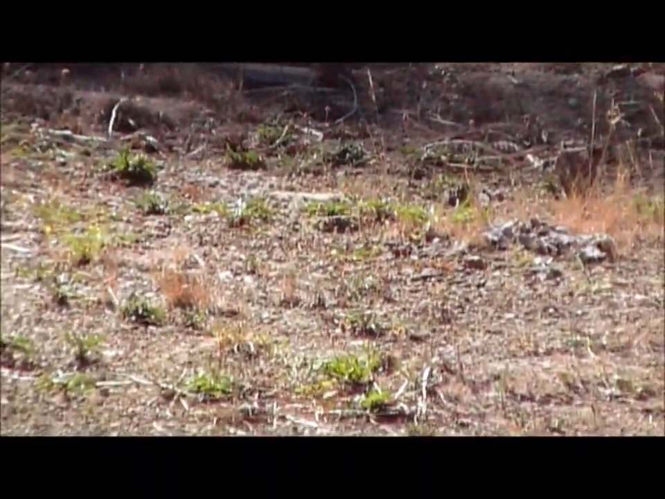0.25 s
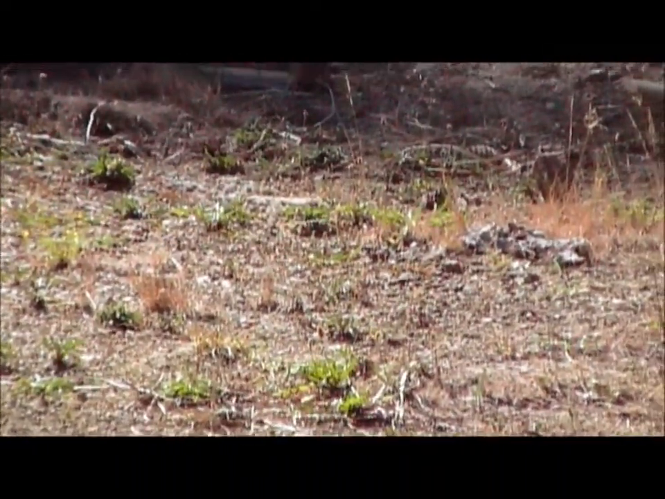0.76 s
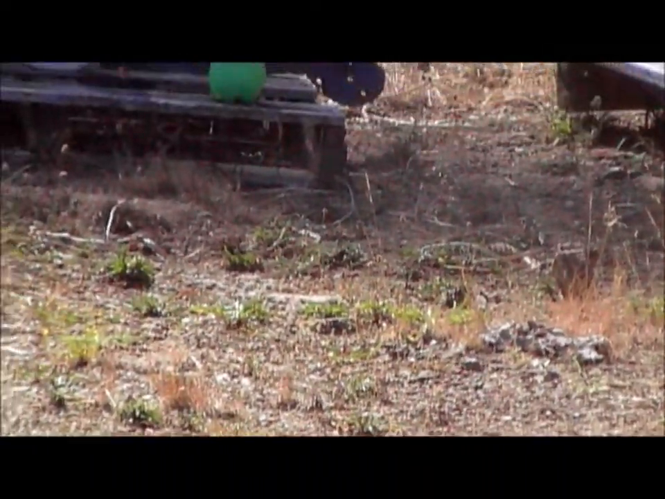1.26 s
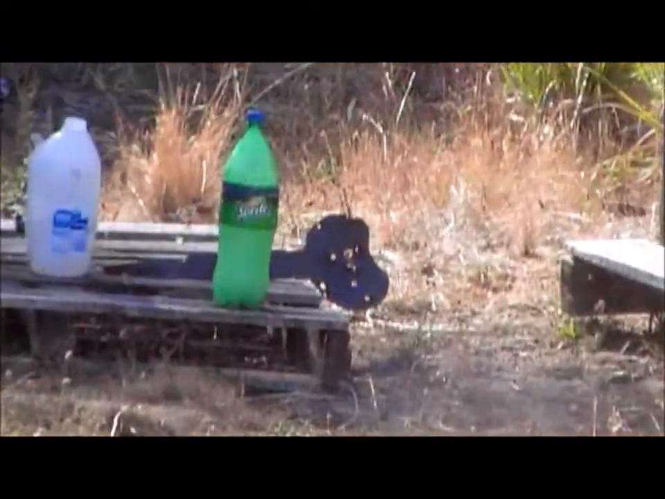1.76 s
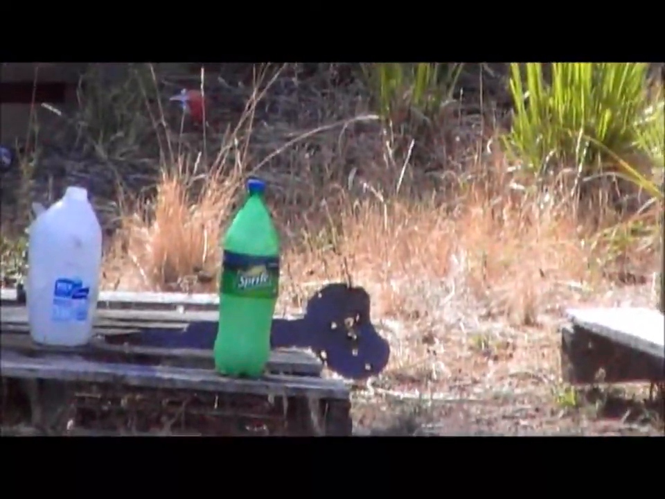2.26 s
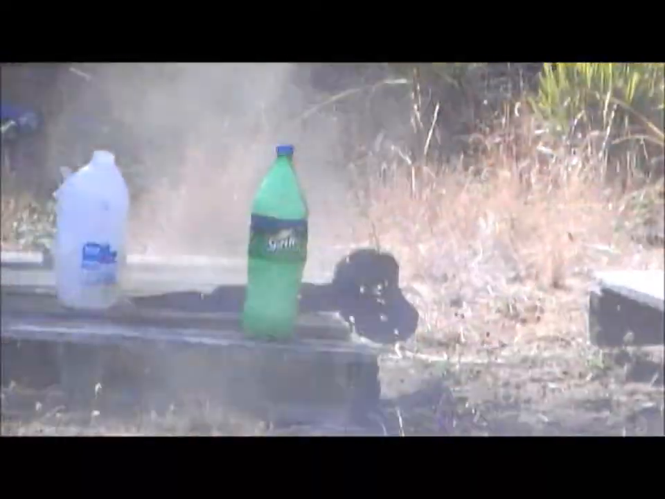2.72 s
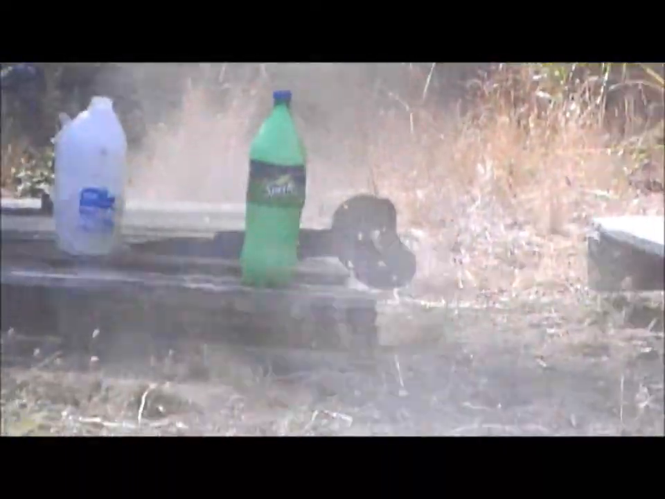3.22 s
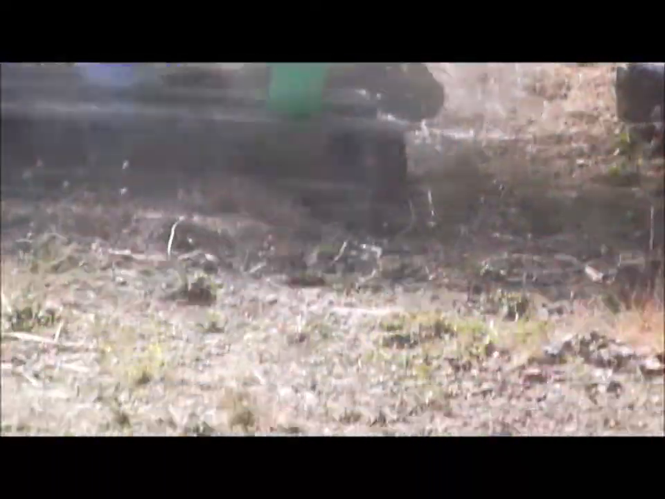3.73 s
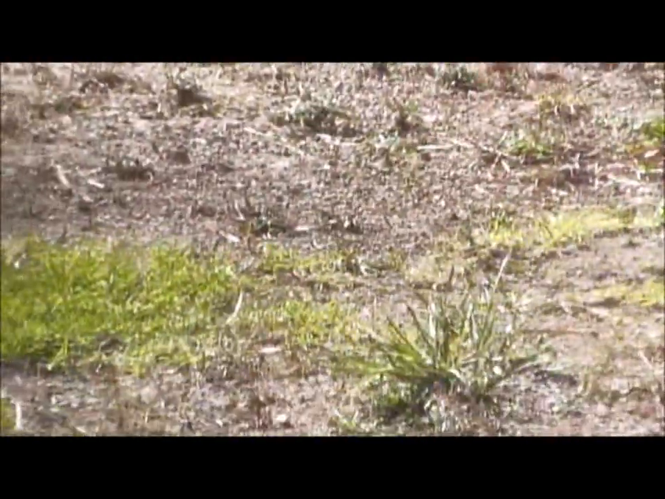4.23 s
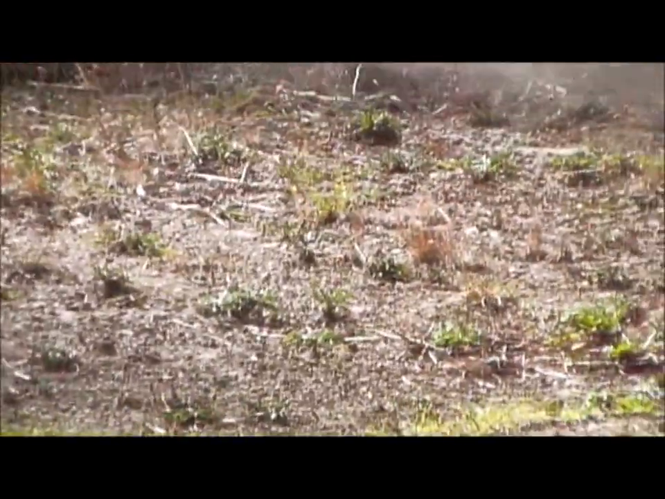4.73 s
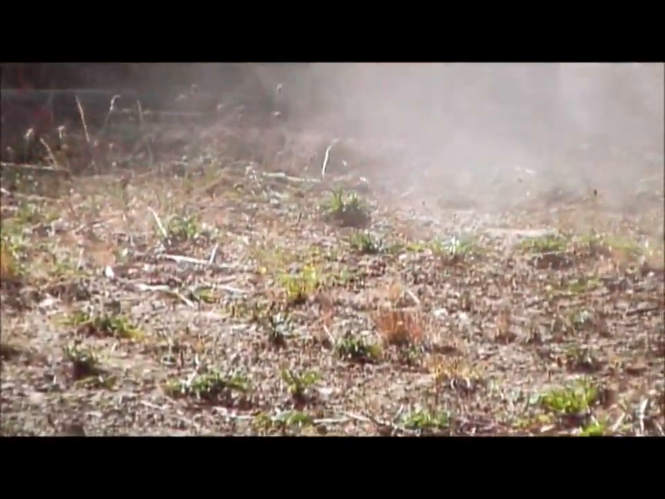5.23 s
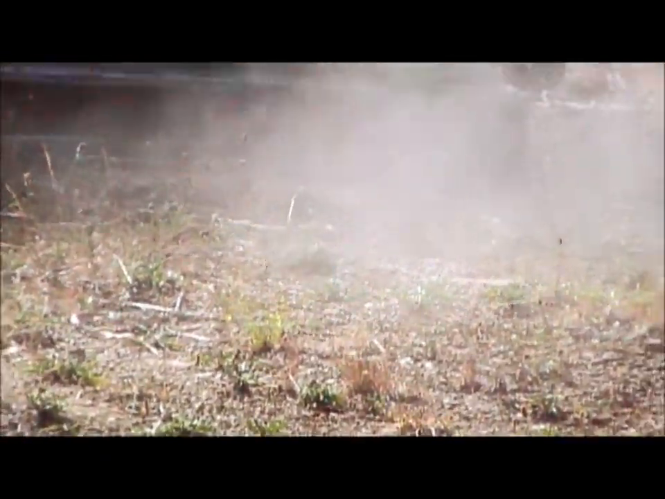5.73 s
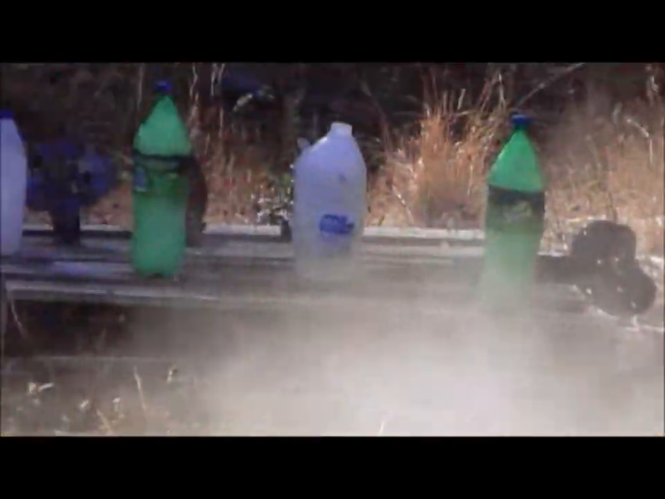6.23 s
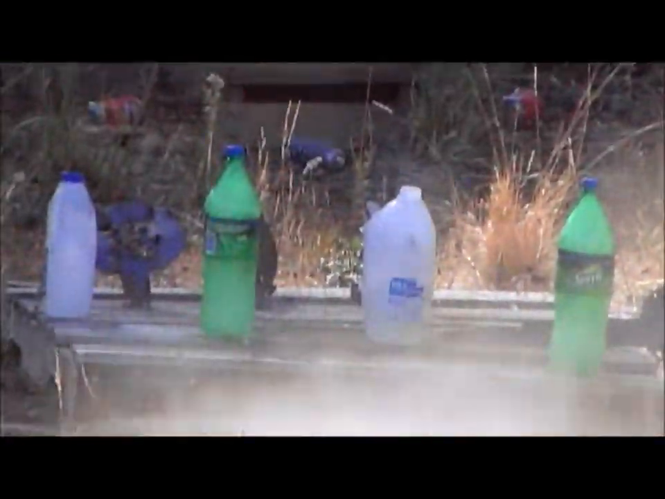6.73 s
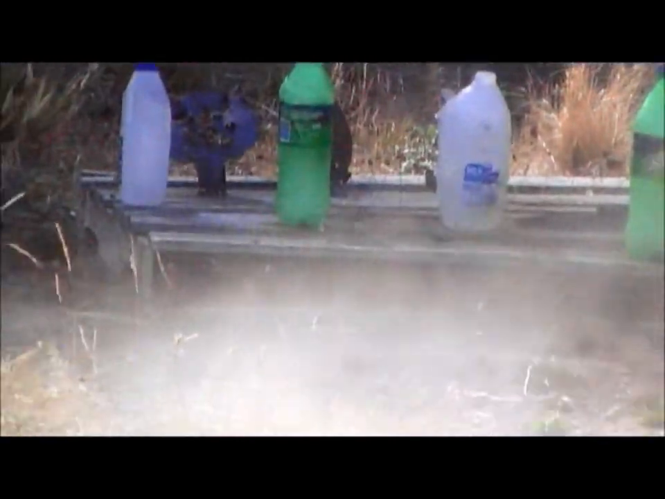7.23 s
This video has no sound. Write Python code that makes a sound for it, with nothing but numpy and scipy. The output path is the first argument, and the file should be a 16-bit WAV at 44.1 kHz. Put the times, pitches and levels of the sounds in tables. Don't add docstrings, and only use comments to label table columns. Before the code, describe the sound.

From 0 to 2.5 seconds, a quiet outdoor bed: far low rumble, airy cicada hiss, short dry cricket rasps and rapid, very high katydid ticks, with a couple of tiny clicks. At 2.53 a single rifle shot bursts out, extremely loud, clipped and crunchy on a small stereo microphone, with a short low thump. Hard bright slaps follow within a tenth of a second, then dense hillside returns surge around 2.75 and 3.0, becoming duller and rolling away; a weak far return lingers around 3.7 to 3.9. From about 4.0 to 4.3 small gritty clicks patter nearby as the tail disappears. The insect bed resumes, slightly rumblier, with faint pure bird peeps from 5.5 onward. A light metal tick at 7.02 precedes a sharper, bright double clack of gun parts around 7.15, then the quiet insects continue to the end at about 7.5.

```python
import sys
import numpy as np
from scipy import signal
from scipy.fft import rfft, irfft, next_fast_len
from scipy.io import wavfile

SR = 44100
rng = np.random.default_rng(int(sys.argv[2]) if len(sys.argv) > 2 else 0)


def generate_wav(signal):
    frames = np.transpose(np.atleast_2d(signal))
    scaled = np.clip(frames, -1, 1) * 32767
    pcm = np.round(scaled).astype(np.int16)
    wavfile.write(sys.argv[1], SR, pcm)


def volts_from_decibels(level):
    exponent = np.asarray(level, float) / 20
    return 10 ** exponent


N = 329427

# (time [s], level [dB], hold [ms], low edge [Hz], high edge [Hz])
SLAPS = [(2.5319, 5, 7, 2400, 9000), (2.5325, 5, 5, 800, 3600), (2.5705, -12, 1.2, 3000, 8000),
         (2.6012, -8, 5.5, 1500, 9000), (2.6290, -15, 3.5, 800, 7000), (2.6331, -8, .2, 1000, 9000),
         (2.6344, -9, 1.5, 2050, 2650), (2.6348, -11, 3, 4500, 7500), (2.6452, -4, .5, 1500, 10000),
         (2.7530, -18, 4, 1200, 8000), (2.8070, -17, 42, 1100, 2100), (2.7900, -12, .4, 800, 6000),
         (2.8715, -12, .4, 500, 4000), (3.0070, -13, .4, 500, 2800), (3.1905, -28, .4, 6000, 11000)]
SLAP_T60_MS, SLAP_T60_PER_HOLD = 6, 0.66
THUMP_DB, THUMP_HZ, THUMP_T60_S = -5, 70.5, .018

# (arrival [s], level [dB], rise [s], fall [dB/s], tilt [dB/octave])
RETURNS = [
    (2.533, -1.5, 0.0026, 150, -3.5),
    (2.535, 2, 0.013, 158, 2.5),
    (2.60, -13, .018, 15, 4.5),
    (2.645, -1.5, 0.04, 377, 2.5),
    (2.753, 2.5, 0.059, 84.5, 2),
    (2.81, -1.5, 0.064, 94, 0),
    (2.9, -1, 0.123, 22.5, 1),
    (3.005, 3.1, 0.042, 132, -0.05),
    (3.05, -6.5, 0.094, 27.5, 1.5),
    (3.7, -22.5, 0.22, 11, 4),
]
SHOT_S, SILENT_S = 2.533, 5.0
FRONT_DB, BASS_LAG = 9, .18
PATH_DB_PER_S, PATH_SLOPE = 21, 1.33
AIR_DB_PER_S = 14.5
HORIZON_S, HORIZON_DB, HORIZON_FADE_S = 3.897, 7.1, 0.084
# (frequency [Hz], level [dB per Hz])
REPORT_COLOUR = [(60, -70), (130, -40), (190, -19.5), (256, -10), (398, -10), (500, 0.5), (650, 0),
                 (1220, -5.5), (1950, -5.5), (3200, -9.5), (6600, -5), (8800, -19), (12500, -30.5),
                 (16000, -48.5)]
# (frequency [Hz], side over mid [dB])
REPORT_SIDE = [(60, -5.5), (110, -14.5), (200, -17.5), (380, -24), (700, -26.5), (1290, -18.5),
               (2380, -20.5), (4400, -22), (8120, -8), (15000, 0)]
REPORT_DB = -13.5

# (time [s], level [dB], brightness [dB/octave])
TOUCHES = [(7.0200, -30, 10), (7.0212, -44, 13), (7.0243, -28, -1), (7.1433, -27, -3), (7.1462, -33, -2.5),
           (7.1495, -37, .4), (7.1567, -24, 6), (7.1580, -11.5, 4.5), (7.1586, -14, 5), (7.1612, -16.5, 0),
           (7.1655, -30, 2.5), (7.1720, -36, 4), (7.1790, -37, 3)]
# (frequency [Hz], level [dB], t60 [s])
METAL_MODES = [(1780, -22, .020), (2600, -9, .030), (3600, -8, .030), (4500, -15, .016), (5700, -9, .024),
               (5950, -9, .024), (6400, -7, .026), (7400, -1, .010), (7700, -2, .014), (8050, -1, .010),
               (8900, 1, .007), (10650, -2, .012)]
# (time [s], level [dB], t60 [ms], low edge [Hz], high edge [Hz])
CLICKS = [(.7701, -45.5, 24, 3800, 5400), (.8270, -39, 20, 1000, 6800), (1.2895, -47, 15, 3500, 5500),
          (3.9740, -43.5, 50, 3770, 10980), (3.9890, -33, 15, 1500, 7020), (3.9943, -33, 73, 1200, 7460),
          (4.0190, -39, 60, 2500, 8000), (4.0458, -41, 10, 7440, 12000), (4.243, -45, 49, 1000, 4500),
          (4.2378, -36, 40, 3000, 7000), (4.2935, -32, 12, 3500, 14000), (5.8301, -43, 22, 2000, 5500),
          (5.9693, -40.5, 25, 2200, 5500), (5.5625, -47, 35, 1300, 2800), (7.0200, -35.5, 43, 3520, 12100),
          (7.1442, -32, 36, 2010, 11900), (7.1567, -30.5, 25, 2200, 12100),
          (7.1602, -34.5, 102, 4500, 9240)]
CLICK_HOLD_SHARE = 0.016

# (last tooth [s], level [dB], even teeth [count], slow lead teeth [count])
STROKES = [(.0511, -49, 4, 0), (.2350, -49, 4, 0), (.4086, -48, 4, 0), (.577, -57, 1, 0),
           (1.0146, -47, 15, 10), (1.7178, -47.5, 15, 5), (1.8895, -50, 3, 0), (2.0492, -53, 4, 0),
           (2.2067, -51, 5, 0), (2.3647, -49, 5, 0), (2.508, -45, 5, 0), (3.4643, -44, 13, 7),
           (4.988, -56, 4, 0), (5.1227, -47.5, 4, 0), (5.2682, -45.5, 4, 0), (5.4272, -44, 4, 0),
           (5.5874, -47.5, 4, 0), (5.7613, -47, 4, 0), (5.9459, -47.5, 3, 0), (6.5139, -47, 13, 7),
           (7.4550, -51, 4, 0)]
# (frequency [Hz], level [dB], t60 [s])
WING_MODES = [(10000, -9, .003), (11700, 1, .005), (12700, -1, .003), (14300, -3, .002)]
SHORT_GAP_S, LONG_GAP_S, SLOWING_S = .0074, .00785, .0011

# (time [s], length [s], level [dB])
CHIRPS = [(0.049, 0, -40.5), (.1266, 0.031, -39.5), (0.248, .027, -40), (.407, 0.12, -40),
          (0.767, .057, -39), (1.288, 0.07, -37), (1.634, 0, -34), (1.7614, .039, -37), (1.9684, 0, -36),
          (2.1256, 0, -42), (2.2134, 0.0038, -44), (4.3483, 0.069, -41.5), (4.5773, 0.053, -40),
          (4.714, 0, -43), (4.7908, 0.068, -43), (5.0537, .044, -39), (5.2962, 0.0035, -41.5),
          (5.375, 0.0079, -40.5), (5.8305, 0, -43), (5.969, 0.013, -45), (6.073, 0.0023, -44),
          (6.1592, 0.0085, -42), (6.472, 0.0039, -47.5)]
RASP_GAP_S, FIRST_RASP_DB = .04, -4

# (time [s], length [s], frequency [Hz], level [dB])
PEEPS = [(5.54, .13, 3420, -65), (5.73, .09, 3460, -66), (5.85, .12, 3460, -64), (6.24, .14, 3470, -67),
         (7.33, .12, 3700, -67), (6.29, .07, 2290, -64), (6.43, .07, 2310, -65), (6.55, .07, 2310, -65),
         (6.83, .07, 2320, -65), (7.36, .07, 2310, -63)]
WHINE_HZ, WHINE_DB = 10100, -78.5

# (time [s], level [dB])
CHORUS = [
    [(0.0, -57), (0.75, -56), (1.17, -56), (2.02, -54.5), (2.23, -57.5), (2.45, -55)],
    [(3.9, -56.5), (4.12, -53.5), (4.34, -58), (4.68, -56.5), (5.49, -58.5), (6.23, -55.5), (6.36, -57.5),
     (6.75, -57.5), (7.47, -56.5)],
]
CHORUS_DB = -56
RUMBLE_HZ, CHORUS_HZ, CHORUS_TOP_HZ = 800, 6000, 11000
STIRRED_DB, STIRRED_S = 1.66, 4.0
# (frequency [Hz], level [dB per Hz])
FIELD_COLOUR = [(24, -45), (60, -28.5), (140, -14), (330, -4.5), (700, 3.5), (1150, -1), (1600, -7.5),
                (4000, -7.5), (5200, -3.5), (6500, 1), (7800, -8), (9100, -19), (12500, -25.5),
                (15650, -24.5), (15900, -45)]
# (frequency [Hz], side over mid [dB])
FIELD_SIDE = [(60, 0.5), (99, -6), (160, -7), (270, -7.5), (450, -12), (740, -15), (1220, -12),
              (2010, -10.5), (3330, -9.5), (5500, -22), (9080, 6), (15000, 4)]
FIELD_DB = -51.5

# (time [s], length [s], level [dB], top frequency [Hz])
PUFFS = [(.05, .4, -83, 90), (.5, .8, -86, 100), (1.35, .25, -88, 80), (2.0, 0.39, -87, 90),
         (2.66, .05, -54, 250), (2.74, .07, -48, 240), (3.2, .3, -79, 50), (3.58, .09, -75, 90),
         (5.601, 0.24, -82, 80), (6.599, 0.48, -90, 100)]
# (frequency [Hz], left over right [dB])
LEAN = [(60, -3.5), (150, 2), (380, 1.5), (950, 2.0), (2380, 2.5), (5980, -1.5), (15000, 5)]


def at_hz(points, hz):
    table_hz, values = np.array(points).T
    return np.interp(np.log(hz + 1), np.log(table_hz), values)


def band(x, low_hz, high_hz):
    edges = [low_hz, min(high_hz, .45 * SR)]
    return signal.sosfilt(signal.butter(2, edges, "band", fs=SR, output="sos"), x)


def drift(rate, size):
    knots = rng.standard_normal(int(size / SR * rate) + 2)
    return np.interp(np.arange(size) / SR * rate, np.arange(len(knots)), knots) * np.sqrt(1.5)


def diffuse(from_s, to_s, follow_db, colour, side, level_db, patchy_db, per_s):
    start = round(from_s * SR)
    size = min(round(to_s * SR), N) - start
    t = (start + np.arange(size)) / SR
    pad = next_fast_len(size)
    hz = np.arange(pad // 2 + 1) * SR / pad
    width = np.array([np.ones_like(hz), volts_from_decibels(at_hz(side, hz))])
    shape = volts_from_decibels(at_hz(colour, hz)) * width
    noise = rfft(rng.standard_normal((2, pad))) * shape / np.sqrt(np.mean(shape[0] ** 2))
    centres = np.geomspace(125, 16000, 15)
    together = drift(per_s, size)
    out = np.zeros((2, N))
    for k, centre in enumerate(centres):
        share = np.interp(np.log(hz + 1), np.log(centres), np.arange(len(centres)) == k)
        flicker_db = patchy_db * (0.23 * together + 0.38 * drift(per_s / 2, size))
        course = volts_from_decibels(follow_db(t, centre) + flicker_db)
        out[:, start:start + size] += irfft(noise * share, pad)[:, :size] * course
    return volts_from_decibels(level_db) * out


def bursts(rows):
    out, t = np.zeros(N), np.arange(4000) / SR
    for s, level_db, hold_ms, t60_ms, low_hz, high_hz in rows:
        noise = rng.standard_normal(len(t))
        noise[0] = 4.5
        shape = volts_from_decibels(level_db - 60 * np.maximum(1000 * t - hold_ms, 0) / t60_ms)
        gain = np.sqrt(SR / 2 / (high_hz - low_hz))
        out[round(s * SR):][:len(t)] += gain * band(noise * shape, low_hz, high_hz)
    return out


def ring(clicks, hz, t60):
    radius, turn = volts_from_decibels(-60 / (t60 * SR)), 2 * np.pi * hz / SR
    poles = [1, -2 * radius * np.cos(turn), radius * radius]
    return signal.lfilter([0, np.sin(turn)], poles, clicks + 1e-18)


def ports(x, side_db):
    dull = signal.sosfilt(signal.butter(4, 8200, fs=SR, output="sos"), x)
    mid = dull + volts_from_decibels(-20.5) * (x - dull)
    side = volts_from_decibels(side_db) * band(x, 11000, 11500) + volts_from_decibels(-15.5) * np.roll(dull, 9)
    return np.array([mid, side])


def slaps():
    return bursts([(s, db, hold, SLAP_T60_MS + SLAP_T60_PER_HOLD * hold, low, high)
                   for s, db, hold, low, high in SLAPS])


def thump():
    push = np.zeros(N)
    push[round(SLAPS[0][0] * SR)] = volts_from_decibels(THUMP_DB)
    return ring(push, THUMP_HZ, THUMP_T60_S)


def report_db(t, hz):
    t_coarse, power = t[::32], 1e-12
    for s, level_db, rise, fall_db, tilt_db in RETURNS:
        age, top = t_coarse - s, rise * (1000 / hz) ** BASS_LAG
        course_db = -FRONT_DB * np.maximum(1 - age / top, 0) - fall_db * np.maximum(age - top, 0)
        return_db = level_db + tilt_db * np.log2(hz / 1000) + course_db
        power = power + (age >= 0) * volts_from_decibels(2 * return_db)
    path = t - SHOT_S
    air_db = PATH_DB_PER_S * min(hz / 5500, 1.21) ** PATH_SLOPE * path
    air_db = air_db + AIR_DB_PER_S * max((hz / 7000) ** 2 - 1, 0) * np.minimum(path, .8)
    horizon_db = HORIZON_DB * np.clip((t - HORIZON_S) / HORIZON_FADE_S, 0, 1)
    return np.interp(t, t_coarse, 10 * np.log10(power)) - air_db - horizon_db


def report():
    return diffuse(SHOT_S, SILENT_S, report_db, REPORT_COLOUR, REPORT_SIDE, REPORT_DB,
                   patchy_db=1.0, per_s=110.0)


def gun_parts():
    s, level_db, tilt_db = np.transpose(TOUCHES)
    out = np.zeros(N)
    for hz, mode_db, t60 in METAL_MODES:
        strike_db = level_db + mode_db - 9 + tilt_db * np.log2(hz / 4500) + rng.normal(0, 2.7, len(s))
        clicks = np.zeros(N)
        clicks[(s * SR).astype(int)] = volts_from_decibels(strike_db)
        out += ring(clicks, hz, t60)
    return band(out, 2000, 16000)


def grit():
    return bursts([(s, db, CLICK_HOLD_SHARE * t60, t60, low, high) for s, db, t60, low, high in CLICKS])


def katydid():
    times, level_db, early = [], [], []
    for end, stroke_db, even, lead in STROKES:
        slow = np.maximum(np.arange(even + lead) - even + 1, 0)
        gap = LONG_GAP_S if lead else SHORT_GAP_S
        times = np.append(times, end + gap - np.cumsum(gap + SLOWING_S * slow))
        level_db = np.append(level_db, np.full(len(slow), stroke_db))
        early = np.append(early, slow)
    level_db += rng.normal(0, 1.2, len(times))
    out = np.zeros(N)
    for k, (hz, mode_db, t60) in enumerate(WING_MODES):
        fainter_db = (1.4 * k - 0.56) * early
        clicks = np.zeros(N)
        clicks[(times * SR).astype(int)] = volts_from_decibels(level_db + mode_db - 2.5 - fainter_db)
        out += ring(clicks, hz, t60) * (-1) ** k
    return out + volts_from_decibels(-9) * np.roll(out, round(.0042 * SR))


def crickets():
    rasps = []
    for s, length, peak_db in CHIRPS:
        count = 1 + max(round(length / RASP_GAP_S - .2), length > 0)
        for at in np.linspace(s, s + length, count):
            rasps.append((at, peak_db - 14.5 + FIRST_RASP_DB * (at == s), 9.0, 25, 4000, 5500))
    return bursts(rasps)


def peeps():
    t = np.arange(N) / SR
    whine_phase = 2 * np.pi * WHINE_HZ * t + 1.5 * drift(60.0, N)
    out = volts_from_decibels(WHINE_DB + 1.2 * drift(6.0, N)) * np.sin(whine_phase)
    for s, length, hz, level_db in PEEPS:
        swell = np.sin(np.pi * np.clip((t - s) / length, 0, 1))
        out += volts_from_decibels(level_db + 0.5) * swell * np.sin(2 * np.pi * hz * t)
    return out


def field_db(t, hz):
    s, chorus_db = np.concatenate(CHORUS).T
    share = np.interp(np.log(hz), np.log([RUMBLE_HZ, CHORUS_HZ, CHORUS_TOP_HZ]), [0, 1, .4])
    rumble_db = STIRRED_DB * (np.clip(t - STIRRED_S + 1, 0, 1) - .5)
    return (1 - share) * rumble_db + share * (np.interp(t, s, chorus_db) - CHORUS_DB)


def field():
    return diffuse(0, N / SR, field_db, FIELD_COLOUR, FIELD_SIDE, FIELD_DB, patchy_db=2.2, per_s=12.0)


def breeze():
    out = np.zeros((2, N))
    for s, length, level_db, top_hz in PUFFS:
        size = round(length * SR)
        noise = band(rng.standard_normal((2, SR)), top_hz / 2.5, top_hz)
        swell = np.sin(np.pi * np.arange(size) / size)
        out[:, round(s * SR):][:, :size] += volts_from_decibels(level_db) * swell * noise[:, -size:] / noise.std()
    return out * volts_from_decibels([[0], [-8]])


def scene():
    near = ports(slaps() + grit() + gun_parts() + crickets(), side_db=-2)
    insect = ports(volts_from_decibels(14.5) * katydid(), side_db=-17)
    shot = report() + thump() * [[1], [-.25]]
    mid, side = shot + near + insect + peeps() * [[1], [.4]] + field() + breeze()
    return np.array([mid + side, mid - side])


def low_pass(x):
    return signal.sosfilt(signal.butter(12, 16360, fs=SR, output="sos"), x)


def record(dry):
    hz = np.arange(N // 2 + 1) * SR / N
    lean = volts_from_decibels(at_hz(LEAN, hz) / 2 * np.array([[1], [-1]]))
    leaning = irfft(rfft(dry) * lean, N)
    wobble = band(np.minimum(leaning ** 2, 1), 22, 48) * volts_from_decibels([[-30], [-27]])
    return low_pass(np.clip(leaning + wobble, -.93, .93))


dry = scene()
out = record(dry)
generate_wav(out)
```